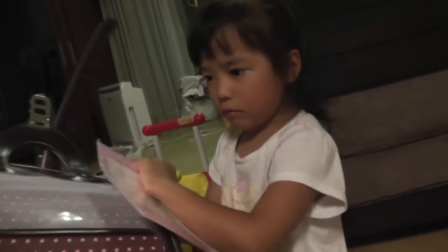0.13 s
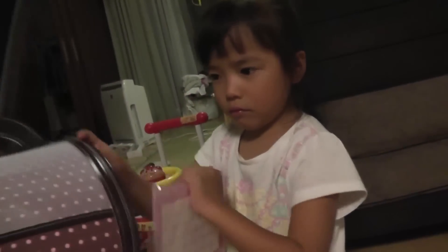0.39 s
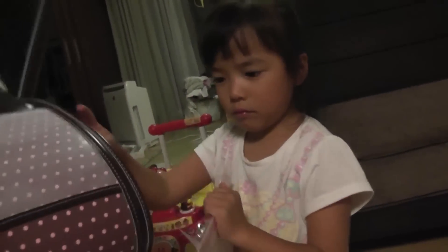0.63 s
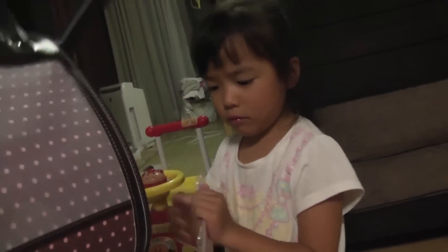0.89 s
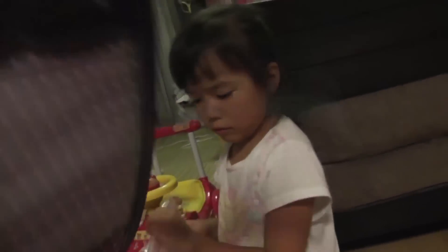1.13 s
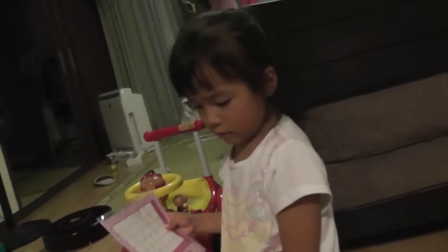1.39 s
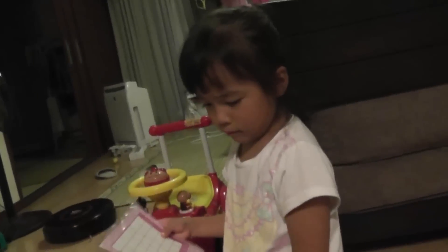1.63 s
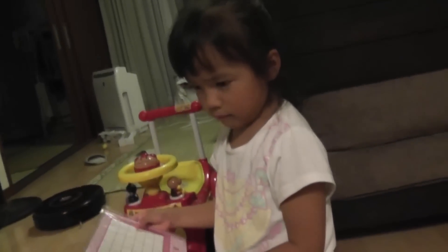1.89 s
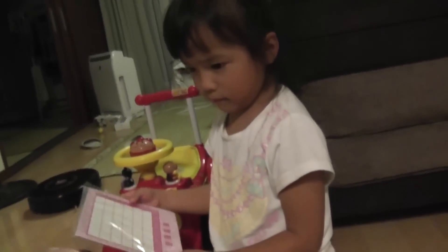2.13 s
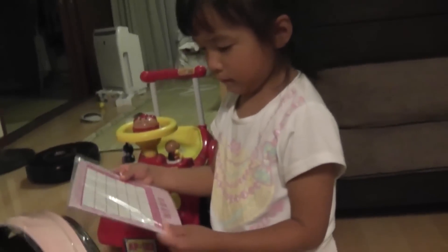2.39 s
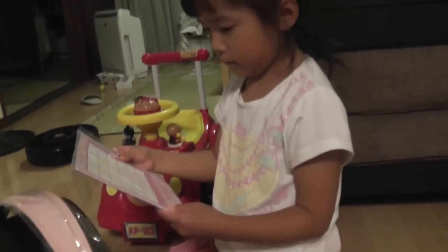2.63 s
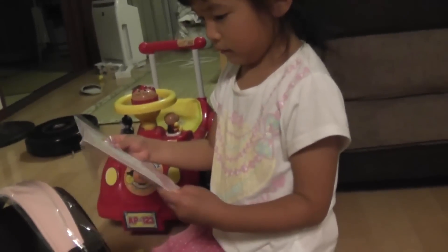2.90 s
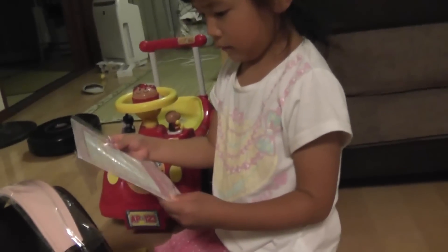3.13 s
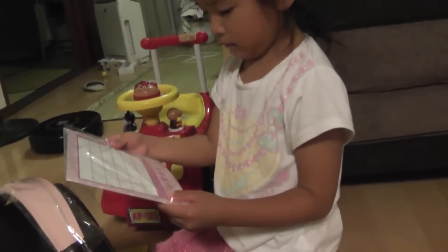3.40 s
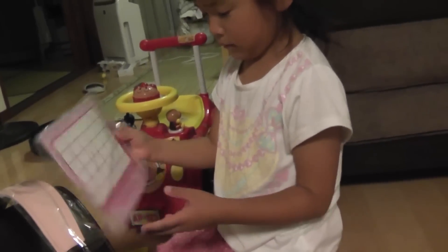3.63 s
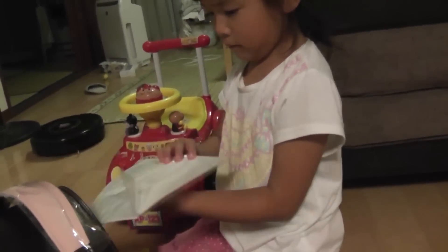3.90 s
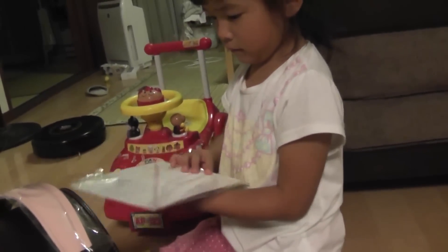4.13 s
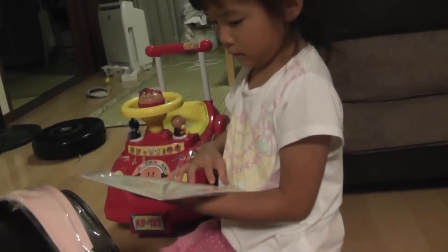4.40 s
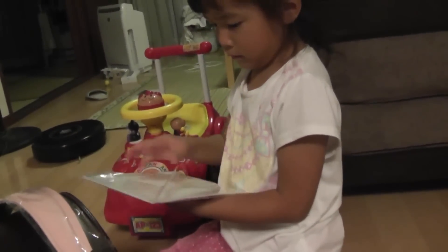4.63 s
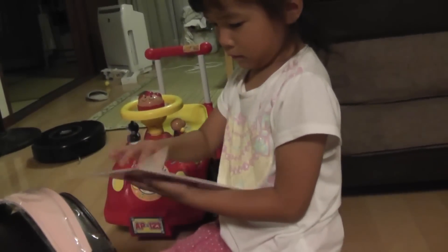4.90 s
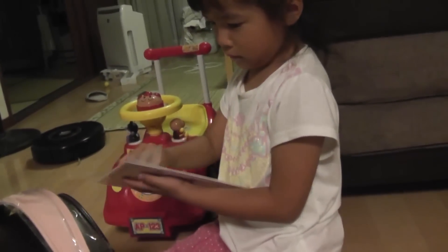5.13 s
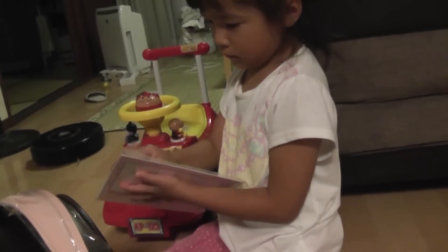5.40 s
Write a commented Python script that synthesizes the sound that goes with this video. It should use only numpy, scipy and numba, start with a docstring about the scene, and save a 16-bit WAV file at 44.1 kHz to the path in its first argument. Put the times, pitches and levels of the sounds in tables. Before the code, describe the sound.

In a quiet living room with faint hum, a child handles stiff sheets in a plastic sleeve near the microphone. Crisp crackles quickly thicken, with hollow knocks from a stiff bag and the loudest snap about a second and a half in. Rustling continues, fades by three seconds, then brief small crinkles, soft floorboard thuds and tiny squeaks remain.

```python
"""A steady hum and room air come first, with a faint rustle; then stiff sheets and a plastic sleeve are handled
near a camera in a living room. Creases snap as filtered noise puffs, dense ones merge into rushes, and the film
rustles by countless tiny slips. Knocks on a stiff bag excite damped modes, heels thud on floorboards (damped
sines), and short narrow-band squeaks come late. A diffuse echo surrounds all but the thuds, hum and air."""
import sys
import numpy as np
from scipy import signal
from scipy.fft import rfft, irfft, next_fast_len
from scipy.io import wavfile
from scipy.ndimage import uniform_filter1d
from numba import njit

SR = 44100
rng = np.random.default_rng(int(sys.argv[2]) if len(sys.argv) > 2 else 0)


def boost_factor(decibels):
    """Convert a level in decibels to a linear amplitude factor."""
    exponent = np.asarray(decibels, float) / 20
    return 10 ** exponent


def store_pcm(level_fs):
    """Save levels as 16-bit WAV."""
    pcm = np.round(np.clip(level_fs, -1, 1) * 32767).astype(np.int16)
    wavfile.write(sys.argv[1], SR, np.atleast_2d(pcm).T)


N = 243519

# blows on bag and card: t/s of the knock, less about 2 ms, peak level of the body/dB before the room,
# centre f/Hz, t60/s
BLOWS = [(0.29, -38, 231, .06), (.447, -7.5, 340, 0.06), (.806, -17, 376, 0.21),
         (1.059, -35.5, 2080, 0.022), (1.111, -35, 540, 0.028), (1.298, -31.5, 1580, 0.038),
         (1.344, -29.5, 1260, 0.029), (1.394, -34, 820, 0.065), (1.419, -36, 490, 0.056),
         (1.484, -7, 850, 0.19), (1.507, -9, 255, 0.14), (1.529, -17, 358, 0.039),
         (1.9304, -8.5, 553, 0.026), (1.969, -16.5, 428, 0.11), (2.017, -30.5, 450, 0.047),
         (2.312, -28.5, 1010, .18), (2.386, -13, 594, 0.083), (2.419, -17.5, 412.5, 0.063),
         (2.483, -26.5, 206, .047), (3.514, -48, 610, .18), (3.758, -29.5, 245, 0.2),
         (3.804, -27, 875, 0.024), (3.818, -35, 990, 0.031), (3.881, -25, 232, 0.049),
         (3.985, -38, 1900, 0.11), (4.056, -41, 201, 0.059), (4.311, -37, 1720, 0.028),
         (4.751, -33, 310, 0.043)]
# stereo width of a diffuse field at close-set microphones: f/Hz, side over mid (ratio, before a share is applied)
STEREO_WIDTH = [(40, .5), (130, .3), (350, .42), (700, .33), (1500, .33), (3000, .22), (5500, .1),
                (9500, .32), (13000, .65)]


def along(table, hz):
    """Interpolation of (f/Hz, value) rows on a log-frequency axis."""
    f, v = np.transpose(table)
    return np.interp(np.log(np.maximum(hz, 1)), np.log(f), v)


def colour(x, table):
    """Spectral shaping: weights each frequency by (f/Hz, level/dB) rows and sets the rms to 1."""
    hz = np.arange(x.shape[-1] // 2 + 1) * SR / x.shape[-1]
    y = irfft(rfft(x) * boost_factor(along(table, hz)), x.shape[-1])
    return y / np.sqrt(np.mean(y ** 2))


def diffuse(size, share):
    """Diffuse-field coherence: left and right noise share a mid part and differ by a side part."""
    mid, side = rfft(rng.standard_normal((2, size)))
    side = share * side * along(STEREO_WIDTH, np.arange(len(side)) * SR / size)
    return irfft(np.array([mid + side, mid - side]), size)


def bursts(s, db, hz, t60, octaves, blow, rise_s, order=2):
    """Impact excitation: an impulse and a decaying noise puff, at most 0.29 s long, drive a band-pass filter."""
    out = np.zeros(N + SR)
    t = np.arange(int(.3 * SR)) / SR
    for s, db, hz, t60, octaves, rise in zip(*np.broadcast_arrays(s, db, hz, t60, octaves, rise_s)):
        size = int(min(max(t60, 12 / hz) + rise, .29) * SR)
        decay = np.exp(-np.log(1000) * np.maximum(t[:size] - rise, 0) / t60)
        onset = np.minimum(t[:size] / rise, 1)
        x = rng.standard_normal(size) * decay * onset
        x[0] = blow * np.sqrt(SR / hz)  # a lower band gets a stronger impulse
        edges = np.minimum(hz * 2 ** (np.array([-.5, .5]) * octaves), [.4 * SR, .45 * SR])
        x = signal.sosfilt(signal.butter(order, edges, "band", fs=SR, output="sos"), x)
        start = int(s * SR)
        out[start:start + size] += boost_factor(db) * x / np.abs(x).max()
    return out[:N]


@njit
def rings(start, hz, t60, left, right, size, sr):
    """Modal superposition: damped sines, each starting at its own moment and ending after its t60."""
    out = np.zeros((2, size))
    for k in range(len(start)):
        p = np.exp(2j * np.pi * hz[k] / sr - np.log(1000) / (t60[k] * sr))
        z = 1 + 0j
        i0 = int(start[k] * sr)
        for i in range(max(i0, 0), min(i0 + int(t60[k] * sr), size)):
            out[0, i] += left[k] * z.imag
            out[1, i] += right[k] * z.imag
            z *= p
    return out


def crackle(table, per_s, tail_db, blur_s, smooth):
    """Stick-slip friction: random slips with a long tail of sizes, each a puff of noise, over a smooth hiss."""
    chance, rank = rng.random((2, N))
    ticks = (chance < per_s / SR) * boost_factor(-tail_db * np.log(rank + .04))
    fade = np.exp(-1 / (blur_s * SR))  # blur_s is the 1/e time of one puff
    puffs = signal.lfilter([1], [1, -fade], ticks)
    puffs = puffs / np.sqrt(np.mean(puffs ** 2)) + smooth
    return colour(rng.standard_normal(N) * puffs, table)


def effort(s):
    """Work of the hands: rustle level in dB, before flutter and room, interpolated at the given times."""
    # how hard the hands work the film: t/s, rustle level/dB
    handling = [(0.0, -61), (.25, -62), (.42, -49), (.74, -49.5), (.89, -44.5), (1.44, -43.5),
                (1.58, -39.5), (2.08, -42), (2.37, -48), (2.51, -39), (2.69, -46.5), (2.84, -52),
                (3.0, -51.5), (3.43, -61), (3.78, -49), (3.95, -53), (4.43, -62.5), (5.52, -70)]
    return np.interp(s, *np.transpose(handling))


def room_air():
    """Broadband ambient noise: steady, diffuse and coloured."""
    # spectrum of the room air: f/Hz, relative level/dB
    air_spectrum = [(15, -45), (25, -7), (111, -7), (192, -4), (245, -7), (313, -9), (358, -5.5),
                    (766, -13), (1510, -20), (1780, -16.5), (2670, -26), (6920, -33), (13600, -43),
                    (16500, -59)]
    return boost_factor(-56) * colour(diffuse(N, share=2.37), air_spectrum)


def hum():
    """Tonal radiation of an appliance: mains hum whose partials waver slightly in level."""
    # hum partials: f/Hz, level/dB (1.5 dB below mean peak amplitude)
    partials = [(118.4, -68), (242.2, -67), (360.7, -70.5)]
    t = np.arange(N) / SR
    waver_s, waver_db = .15, 0.74
    waver = uniform_filter1d(rng.standard_normal((len(partials), N)), int(waver_s * SR)) * np.sqrt(waver_s * SR)
    out = 0
    for (hz, db), w in zip(partials, waver):
        out = out + boost_factor(db + 1.5 + waver_db * w) * np.sin(2 * np.pi * hz * t)
    return out


def flutter():
    """Amplitude modulation: the grip slackens and tightens, so the gain wanders in short smoothed steps."""
    step_db, step_s = 1.5, 0.023
    hold = int(step_s * SR)
    steps = np.repeat(rng.standard_normal(N // 200), hold)[:N]
    return boost_factor(step_db * uniform_filter1d(steps, hold // 2))


def film(film_db):
    """Stick-slip rustle of the film: brief slips whose level follows the hands."""
    # spectrum of the film's rustle: f/Hz, relative density/dB per Hz
    film_spectrum = [(880, -36), (1500, -4), (2580, -11.5), (5580, 6.5), (7390, 4.5), (10500, -4.5),
                     (13100, -16.5), (15100, -20), (16000, -53), (16500, -51)]
    rustle = crackle(film_spectrum, per_s=290, tail_db=0.5, blur_s=.0015, smooth=0.54)
    return rustle * boost_factor(film_db) * flutter()


def scuff(film_db):
    """Sliding friction of bag and cloth: duller slips that swell less steeply than the film's rustle."""
    # spectrum of the scuffing: f/Hz, relative density/dB per Hz
    scuff_spectrum = [(71, -68), (120, -13), (325, 0), (372, -3.5), (612, -4), (664, 0.5), (1040, -4.5),
                      (3000, -17.5), (3900, -9), (6600, -120)]
    scuff_db = -55 + 0.69 * (film_db + 50)  # -55 dB when the film is at -50 dB
    return crackle(scuff_spectrum, per_s=120, tail_db=3, blur_s=0.004, smooth=0.8) * boost_factor(scuff_db)


def lesser_snaps():
    """Random point process: lesser creases come more often and louder the harder the hands work."""
    count, over_film_db, spread_db = 110, 12, 7.5
    median_hz, crisp_db = 6400, -36.5
    t = np.arange(0, N / SR, .001)
    odds = np.cumsum(boost_factor(.7 * effort(t)))
    s = np.interp(rng.random(count), odds / odds[-1], t)
    chance = rng.standard_normal((3, count))
    db = effort(s) + over_film_db + spread_db * chance[0]
    return s, db, median_hz * 2 ** (0.25 * chance[1]), crisp_db + 5 * chance[2]


def snaps():
    """Buckling instability: a crease flips with a bright crack, a thin top edge and a duller flap of the sheet."""
    # the clearest creases: t/s of the snap, less 1 ms, peak level of the crack/dB before the room,
    # centre f/Hz, level of the top edge relative to the crack/dB
    crease_table = [(0.191, -19, 6560, -32), (0.2348, -22.5, 6750, -24), (0.2916, -17.5, 6160, -33),
                    (0.4482, -12, 5800, -34), (0.4873, -13.5, 6500, -36), (0.5175, -15.5, 7930, -27),
                    (0.5264, -13.5, 6400, -28), (0.5453, -14.5, 7060, -22), (0.5716, -13, 5250, -32),
                    (0.6497, -32, 6000, -27), (0.6813, -15.5, 6100, -39), (0.7048, -28, 6410, -33),
                    (0.761, -17, 6250, -33), (0.78, -19, 6900, -34), (0.7962, -12.5, 6260, -30),
                    (0.8113, -15, 5650, -36), (0.844, -21, 5780, -29), (0.8574, -11.5, 6230, -19),
                    (0.8798, -7, 6660, -33), (0.951, -9.5, 7160, -29), (1.01, -27, 7990, -31),
                    (1.062, -11, 6270, -20), (1.1628, -12, 6000, -36), (1.1835, -14.5, 7100, -32),
                    (1.232, -19, 5600, -30), (1.246, -33, 6000, -23), (1.3016, -11.5, 6600, -32),
                    (1.3472, -7, 5900, -16), (1.3582, -5.5, 7570, -27), (1.3804, -25.5, 7010, -24),
                    (1.3969, -8.5, 6200, -29), (1.4184, -16, 5800, -26), (1.4406, -15, 7500, -31),
                    (1.484, -1.5, 5870, -35), (1.546, -19, 7700, -28), (1.6048, -15, 6400, -27),
                    (1.6475, -21, 6400, -32), (1.7325, -15, 6140, -28), (1.7546, -14.5, 5400, -31),
                    (1.7781, -12, 6140, -25), (1.7867, -12.5, 5980, -36), (1.7984, -28, 5460, -33),
                    (1.8916, -38, 5490, -29), (1.904, -23, 6910, -28), (1.929, -13, 5960, -28),
                    (1.9767, -14, 6200, -32), (2.008, -25.5, 7100, -26), (2.0187, -18.5, 6340, -32),
                    (2.0657, -34, 6410, -27), (2.0959, -17.5, 5660, -27), (2.1553, -15, 6400, -37),
                    (2.167, -24, 6540, -31), (2.2433, -23, 5900, -26), (2.2766, -19.5, 6600, -16),
                    (2.3091, -13, 6940, -33), (2.3166, -14, 7100, -21), (2.362, -12.5, 5500, -29),
                    (2.3693, -24, 6050, -26), (2.376, -9.5, 6700, -28), (2.4242, -19.5, 5900, -31),
                    (2.4474, -14.5, 6040, -28), (2.4683, -19.5, 7100, -36), (2.4875, -10, 6730, -32),
                    (2.537, -24, 6470, -26), (2.5411, -16.5, 6240, -33), (2.5673, -18.5, 6850, -29),
                    (2.609, -20, 7760, -26), (2.6135, -15.5, 6900, -31), (2.6515, -20.5, 7700, -20),
                    (2.6706, -12, 6500, -28), (2.6942, -17.5, 6700, -22), (2.7202, -18, 6120, -36),
                    (2.7955, -24, 7000, -23), (2.824, -7, 7100, -38), (2.843, -34, 6040, -23),
                    (2.8785, -24.5, 6710, -30), (2.9383, -22, 5930, -9), (3.1058, -27, 5400, -16),
                    (3.127, -25, 7800, -30), (3.1414, -26.5, 7430, -22), (3.1901, -27.5, 5450, -26),
                    (3.2331, -29, 6540, -28), (3.256, -32, 8000, -20), (3.2745, -25.5, 7600, -20),
                    (3.3667, -31, 7800, -13), (3.3818, -25.5, 6600, -17), (3.4113, -32, 7400, -28),
                    (3.5192, -22.5, 6500, -28), (3.538, -31, 6520, -30), (3.5495, -40, 6900, -29),
                    (3.7237, -27, 6600, -28), (3.8055, -23.5, 6100, -23), (3.8763, -25, 7200, -18),
                    (3.974, -37, 6340, -17), (3.9829, -25.5, 7900, -22), (4.0527, -20, 7050, -9),
                    (4.0731, -27, 5170, -34), (4.1617, -30.5, 6600, -29), (4.2682, -36, 6600, -33),
                    (4.3019, -30.5, 6000, -34), (4.4322, -28.5, 6400, -22), (4.581, -35, 5640, -32),
                    (4.8636, -35, 4900, -34), (5.0205, -43, 5320, -31)]
    s, db, hz, crisp_db = np.hstack([np.transpose(crease_table), lesser_snaps()])
    s = s + .001  # all snaps start 1 ms after their listed times
    chance = rng.standard_normal((2, len(s)))
    t60 = 0.012 * 2 ** (0.55 * chance[0])  # no two last alike
    # flap relative to the crack: -18.5 dB under a -18 dB snap, weaker under louder snaps, with scatter
    dull_db = -18.5 - 0.32 * (db + 18) + 2.5 * chance[1]
    bright = bursts(s, db, hz, t60, octaves=0.87, blow=3.15, rise_s=0.00063, order=3)
    top = bursts(s, db + crisp_db, 15000, .4 * t60, octaves=0.6, blow=4.5, rise_s=.0002)
    dull = bursts(s, db + dull_db, 2150, 2.24 * t60, octaves=1.54, blow=0.95, rise_s=0.0023)
    return bright + top + dull


def rushes():
    """Superposition of dense events: creases too dense to count merge into a swelling, fading, grainy rush."""
    # many creases giving way at once, or card and bag sliding:
    # t/s, peak level/dB before graining and room, centre f/Hz, rise/s, t60/s
    rush_table = [(0.221, -38.5, 650, 0.055, 0.54), (0.248, -28.5, 5950, 0.038, 0.58),
                  (.522, -28, 6140, .003, 0.36), (0.552, -25, 6000, 0.0067, 0.093),
                  (1.172, -31, 6100, 0.0056, 0.74), (1.486, -10, 6140, 0.0029, 0.21),
                  (1.51, -25, 2100, 0.0028, 0.046), (1.55, -33.5, 530, 0.048, 1),
                  (1.962, -27, 6000, 0.038, 0.14), (2.22, -31, 1160, 0.14, 0.22),
                  (2.343, -25.5, 2190, 0.025, 0.19), (2.342, -13, 5830, .036, 0.14),
                  (2.59, -26, 5400, 0.018, 0.25), (3.528, -33.5, 6760, 0.025, 0.077),
                  (3.76, -33.5, 428, 0.067, 0.18), (3.86, -36.5, 585, 0.03, 0.31),
                  (4.399, -48.5, 2180, 0.049, 0.4), (4.722, -37.5, 404, 0.0066, 0.34),
                  (4.74, -41.5, 6000, 0.016, 0.2), (5.071, -49.5, 2050, 0.029, 0.2)]
    s, db, hz, rise, t60 = np.transpose(rush_table)
    octaves = 1.005 + 0.33 * np.log2(6000 / hz)  # lower rushes are wider
    hold = int(0.0019 * SR)
    steps = np.repeat(rng.standard_normal(N // hold + 1), hold)[:N]
    grain = uniform_filter1d(steps, hold // 4)
    return bursts(s, db, hz, t60, octaves, blow=0, rise_s=rise) * boost_factor(3.6 * grain)


def knocks():
    """Impact response: a push, then the dry body of bag or card shudders, with a thin edge above it."""
    s, db, hz, t60 = np.transpose(BLOWS)
    # 1.15 octaves wide at -20 dB and 300 Hz; harder is wider (per dB), higher is narrower (per octave)
    octaves = np.clip(1.15 + .014 * (db + 20) - .27 * np.log2(hz / 300), .4, 2)
    s = s + 0.002196  # the body starts about 2 ms after the listed time
    push = 5.  # strength of the first impulse
    body = bursts(s, db, hz, t60, octaves, blow=push, rise_s=0.0027, order=3)
    edge = bursts(s, db - 2.5, 2.3 * hz, 1.35 * t60, octaves=1.13, blow=push, rise_s=0.00046)
    return body + edge


def shell():
    """Modal resonance: blows on the bag leave its hollow shell ringing."""
    # shell modes: mean f/Hz, level/dB (12.5 dB above its mean relative to the blow), t60/s
    shell_modes = [(219.6, -6.5, 0.12), (277.6, -9.5, 0.12), (349.3, -16.5, 0.63), (375.3, -10.5, 0.46),
                   (422, -8.5, 0.34), (636, -16, 0.27)]
    bag_down_s = 2.6  # later blows fall on card and sleeve
    s, db = np.transpose([row[:2] for row in BLOWS if row[0] < bag_down_s])
    out = 0
    for hz, mode_db, t60 in shell_modes:
        chance = rng.standard_normal((2, len(s)))
        g = boost_factor(db + mode_db - 12.5 + 2.1 * chance[0])
        mode_hz = hz * (1 + 0.0152 * chance[1])
        out = out + rings(s + 0.00312, mode_hz, np.full(len(s), t60), g, g, N, 1. * SR)[0]
    return out


def thuds():
    """Modal excitation: a soft push rings the floorboards; two microphones catch the modes unequally."""
    # heels on the floor: t/s, level/dB before mode levels and smoothing
    thud_table = [(1.145, -45), (1.505, -32), (1.569, -31), (1.952, -28), (2.387, -36), (2.466, -29.5),
                  (4.182, -21.5), (4.224, -27), (4.721, -20.5), (4.753, -19), (4.869, -34.5), (5.285, -47)]
    # floorboard modes: mean f/Hz, level relative to the thud/dB
    board_modes = [(84.7, -3), (68, -11.5), (128, -14), (191.5, -0.5)]
    first_t60_s = 0.2  # of the first mode; the others scale inversely with frequency
    s, db = np.transpose(thud_table)
    out = 0
    for k, (hz, mode_db) in enumerate(board_modes):
        g = boost_factor(db + mode_db) * (-1) ** k  # alternate modes start with opposite sign
        lean = boost_factor(1.9 * rng.standard_normal(len(s)))
        mode_hz = hz * (1 + 0.054 * rng.standard_normal(len(s)))
        t60 = np.full(len(s), first_t60_s * board_modes[0][0] / hz)
        out = out + rings(s, mode_hz, t60, g * lean, g / lean, N, 1. * SR)
    return uniform_filter1d(out, int(0.0047 * SR))  # the push is soft


def squeaks():
    """Narrow-band resonance: a band of nearly constant width in Hz rings briefly."""
    # short chirps, perhaps a finger slipping on the sleeve: t/s, peak level/dB before the room, f/Hz, t60/s
    squeak_table = [(3.883, -30.5, 990, 0.1), (4.57, -56, 1900, .06), (4.574, -45, 5460, .07),
                    (4.575, -52, 2270, 0.57), (4.597, -43, 5150, 0.068), (4.598, -49.5, 1960, .06),
                    (4.633, -62, 5740, .07), (5.029, -50.5, 2150, .09)]
    width_hz = 280  # approximate
    s, db, hz, t60 = np.transpose(squeak_table)
    return bursts(s, db, hz, t60, np.log2(1 + width_hz / hz), blow=0, rise_s=0.0035)


def echo(size):
    """Reverberant decay: spectrum of a diffuse echo that sets in after the first wall and dies octave by octave."""
    # the room: f/Hz, t60/s, echo level/dB before the wet gain
    room_table = [(80, 0.7, -4.5), (208, 0.47, 2.5), (384, 0.3, -2.5), (657, 0.6, 2), (2030, 0.15, 1),
                  (6000, 0.077, -4.5), (14500, 0.13, -0.5)]
    t = np.arange(SR // 2) / SR
    room_hz, t60, db = np.transpose(room_table)
    noise, tail = diffuse(len(t), share=1), 0
    for hz in 62.5 * 2. ** np.arange(8):
        octave = signal.butter(2, [hz / 2 ** .5, hz * 2 ** .5], "band", fs=SR, output="sos")
        decay = np.exp(-np.log(1000) * t / along(np.c_[room_hz, t60], hz))
        tail = tail + signal.sosfilt(octave, noise) * decay
    tail = rfft(tail * np.clip((t - .002) / 0.0022, 0, 1), size)
    # every response shares the room's broad colour; only the fine grain differs
    even = np.sqrt(uniform_filter1d(np.mean(np.abs(tail) ** 2, axis=0), 120 * size // SR)) + 1e-9
    return tail / even * boost_factor(along(np.c_[room_hz, db], np.arange(size // 2 + 1) * SR / size))


def room(direct, wet, hold_s, count):
    """Convolution: the sound switches at random among several responses, so no single echo colours it all."""
    size = next_fast_len(N + SR // 2)
    hop = int(hold_s * SR)
    choice = np.repeat(rng.integers(0, count, N // hop + 1), hop)[:N]
    width = along(STEREO_WIDTH, np.arange(size // 2 + 1) * SR / size)
    out = 0
    for k in range(count):
        gate = uniform_filter1d(1. * (choice == k), hop // 8)  # short crossfades
        side = width * np.exp(2j * np.pi * (k + rng.random()) / count)  # its own stereo phase
        out = out + rfft(direct * gate, size) * np.array([1 + side, 1 - side])
        out = out + rfft(wet * gate, size) * echo(size)
    return irfft(out, size)[:, :N]


def scene():
    """Direct-to-reverberant balance: film close by and fairly dry; blows fill the room more."""
    film_db = effort(np.arange(N) / SR)
    sheets = film(film_db) + snaps() + rushes() + squeaks()
    blows = scuff(film_db) + knocks() + shell()
    wet = boost_factor(-9.5) * sheets + boost_factor(-7.0) * blows
    near = room(sheets + blows, wet, hold_s=.06, count=5)
    balance = boost_factor(np.array([[.3], [-.3]]))  # slightly to the left
    return near * balance + thuds() + room_air() + hum()


def band_limit(x):
    """A steep low-pass at the top of the band."""
    return signal.sosfilt(signal.butter(12, 16970, fs=SR, output="sos"), x)


def record(dry):
    """High-pass filtering and saturation: the camera cuts the deep bass and rounds the loudest peaks."""
    x = signal.sosfilt(signal.butter(3, 55, "high", fs=SR, output="sos"), dry)
    mix = 0.74 * np.tanh(x / 0.71)
    return band_limit(mix)


dry = scene()
out = record(dry)
store_pcm(out)
```